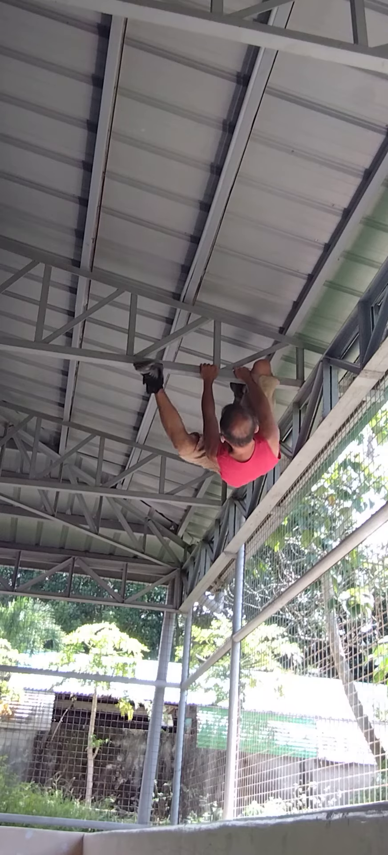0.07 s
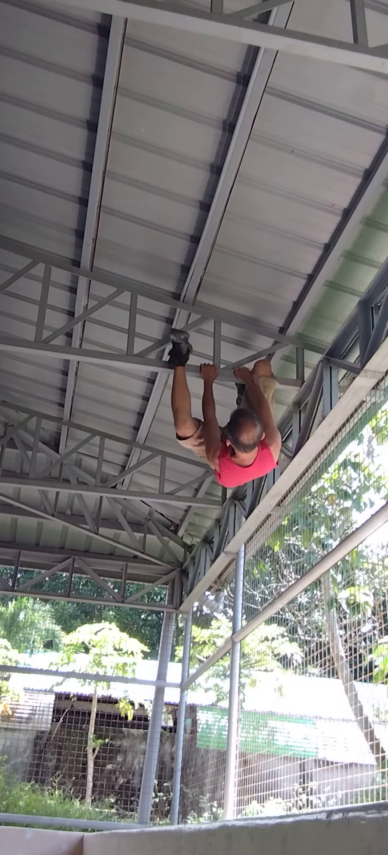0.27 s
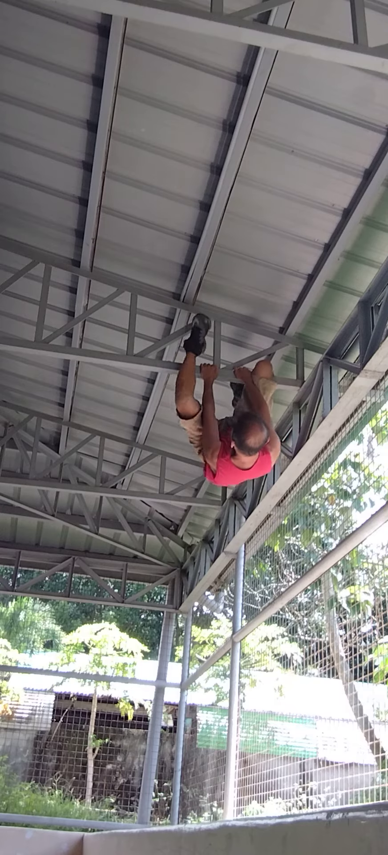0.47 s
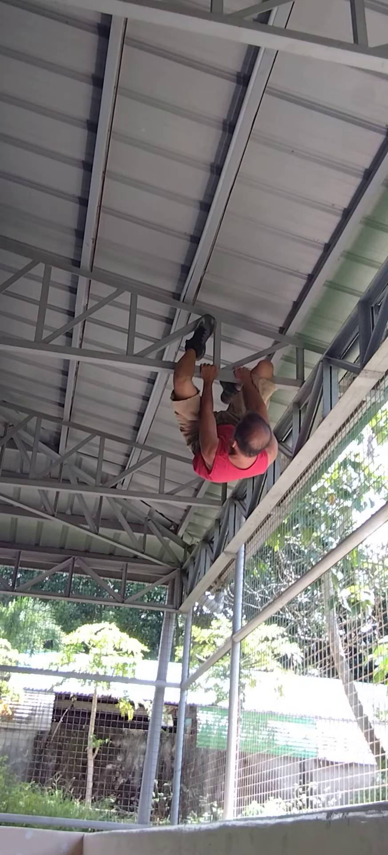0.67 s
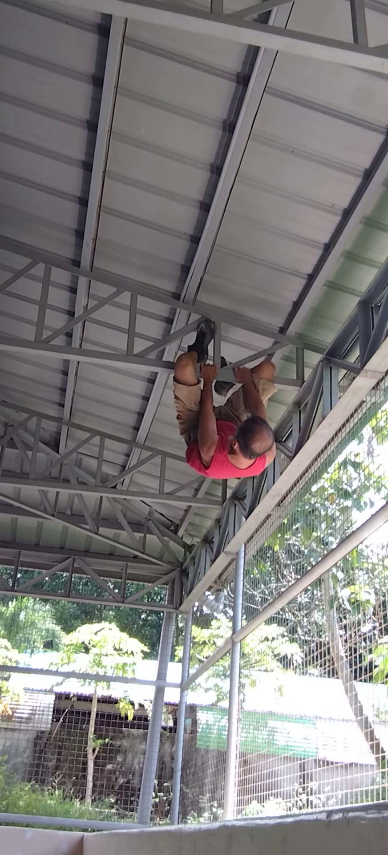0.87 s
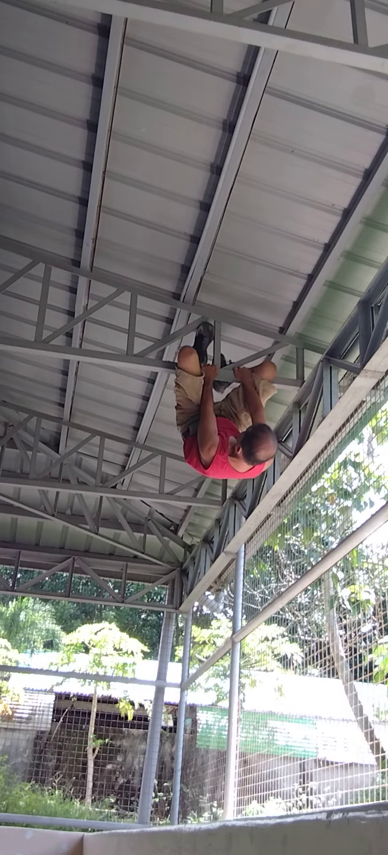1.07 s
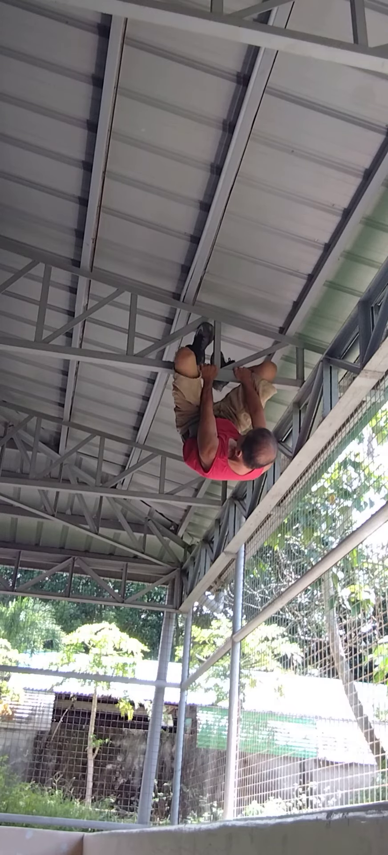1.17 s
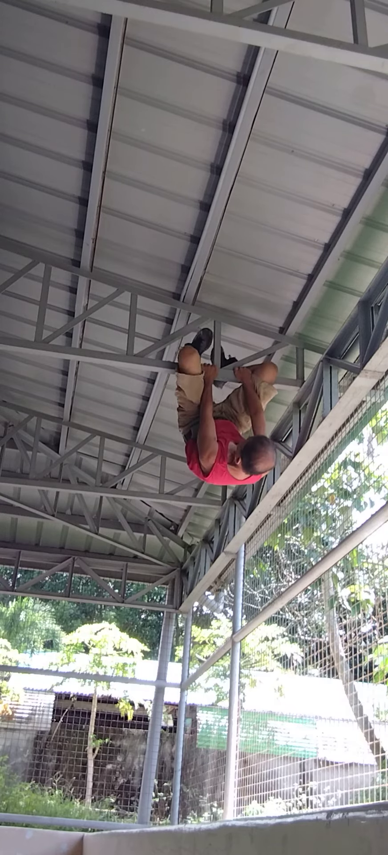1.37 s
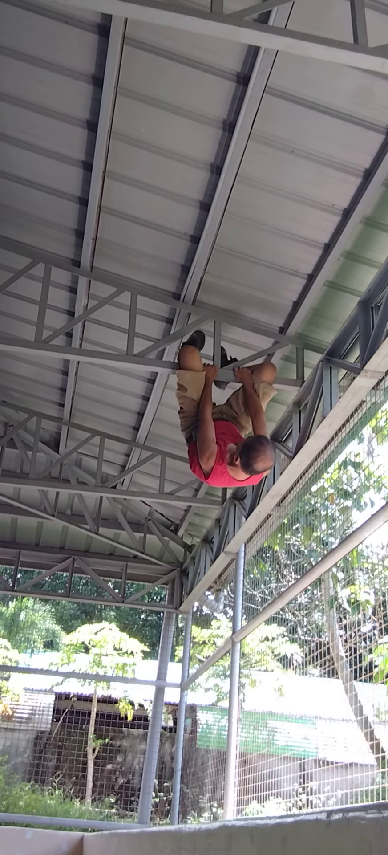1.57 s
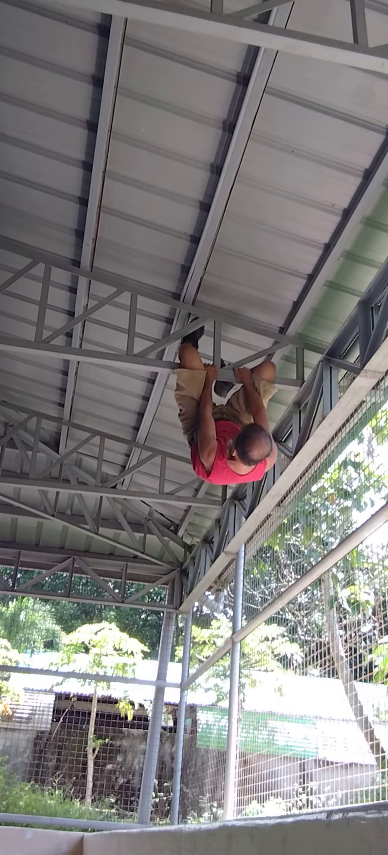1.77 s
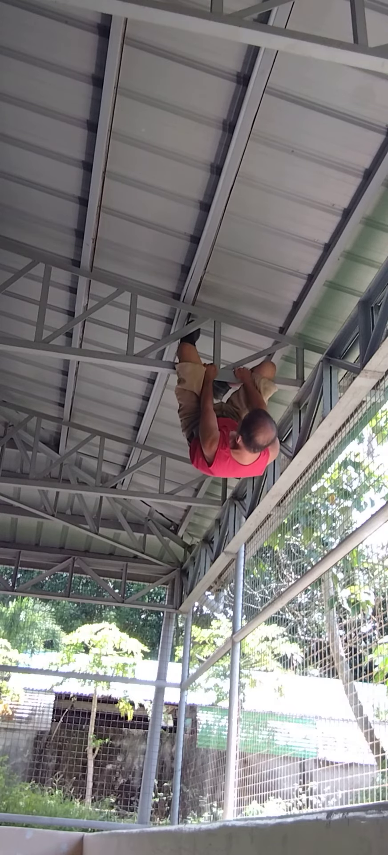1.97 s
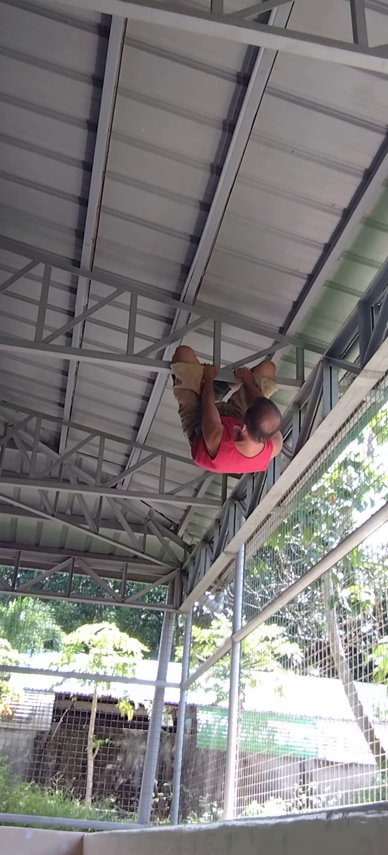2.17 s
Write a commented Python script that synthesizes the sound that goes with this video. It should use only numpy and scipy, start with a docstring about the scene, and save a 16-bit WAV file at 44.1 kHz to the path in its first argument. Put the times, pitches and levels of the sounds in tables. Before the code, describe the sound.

Dull knocks on a steel roof truss in an open shed, over soft steady outdoor noise. The first slaps and thumps at 0.18 s with small clacks; the second, boomier and more ringing, at 0.68 s. Roof sheets rattle and fade. Faint metal groans at 0.9-1.3 s, with light scuffs. Third knock at 1.54 s, then clacks, low pulses, scuffs and a faint rising whistle from 1.94 s.

```python
"""A climber's feet and hands knock on a steel roof truss in an open shed, over steady outdoor noise.
The first knock, near 0.18 s, slaps and thumps; truss modes ring, and noise bands boom and rattle as the roof.
Noise bursts clack, soft low pulses prolong the boom and grainy hiss scuffs before the second, near 0.68 s.
Sine swells then groan as the truss, with more scuffs, until the third knock near 1.54 s.
Clacks, low pulses and scuffs follow it, and from 1.94 s a faint gliding sine whistles upward."""
import sys
import numpy as np
from scipy import signal
from scipy.fft import rfft, irfft
from scipy.io import wavfile
from scipy.ndimage import uniform_filter1d

SR = 44100
rng = np.random.default_rng(int(sys.argv[2]) if len(sys.argv) > 2 else 0)


def bounce(signal):
    """Save signal as a 16-bit WAV file at the path given by the first command-line argument."""
    frames = np.transpose(np.atleast_2d(signal))
    limited = np.clip(frames, -1, 1)
    pcm = np.round(limited * 32767).astype(np.int16)
    wavfile.write(sys.argv[1], SR, pcm)


N = 97020
T = np.arange(N) / SR  # s
HZ = np.fft.rfftfreq(N, 1 / SR)

# Blows on the truss, with the gain of each part:
# start_s, slap_db, thump_db, boom_db, thud_db, clang_db, rattle_db, fizz_db
KNOCK_EVENTS = [(.178, -17, -19, -35, -39.5, -40.5, -30, -43),
                (0.6825, -14.5, -16.5, -27, -36.5, -30, -27, -42),
                (1.5395, -18.5, -16, -28.5, -34, -45, -33, -35)]
# Sharp clacks as the sole and the roof sheets settle: start_s, decay_s (to 1/e), fizz_db, rattle_db
CLACK_EVENTS = [(0.1754, 0.0024, -26, -39.5), (0.192, 0.004, -27, -43), (.2288, 0.0064, -36.5, -30.5),
                (.696, 0.024, -36.5, -30), (0.741, 0.0067, -34.5, -29.5), (0.795, 0.0063, -50, -30.5),
                (1.552, 0.0071, -27, -39), (1.596, 0.0076, -26, -36), (1.62, 0.046, -40, -36.5),
                (1.732, 0.013, -49, -40)]
# Soft low pulses that prolong the boom after the knocks: start_s, pitch_hz, level_db
LOW_PULSE_EVENTS = [(0.233, 79, -25), (0.266, 92, -25), (0.784, 121, -21.5), (1.29, 77.6, -40),
                    (1.789, 102, -25), (1.863, 80, -30.5)]
# The loaded truss groans briefly: start_s, length_s, pitch_hz, level_db
GROAN_EVENTS = [(.87, 0.14, 511, -36.5), (1.096, 0.079, 316, -38), (1.214, 0.13, 316, -41.5)]
# Shoe and cloth scuffs: start_s, length_s, level_db, peak_hz, peak_height_db
SCUFF_EVENTS = [(0.274, 0.2, -41, 7360, 11), (0.419, 0.12, -38.5, 1540, 17.5), (0.907, 0.26, -45, 5530, 20),
                (1.082, 0.18, -48, 7100, 13.5), (1.743, 0.19, -40, 7200, 5.5),
                (1.877, 0.41, -45.5, 2140, 11.5)]
# Faint distant whistle, breakpoints of its glide: time_s, pitch_hz, level_db
WHISTLE_GLIDE = [(1.942, 2390, -60), (2.071, 2475, -44), (2.102, 2530, -43), (2.13, 2530, -48),
                 (2.2, 2560, -51)]
# Truss modes: pitch_hz, t60_s, first_spot_db, second_spot_db, third_spot_db
TRUSS_MODES = [(121.8, 0.96, -30, -23.5, -38.5), (222.6, 1.2, -43.5, -35.5, -41.5),
               (358, 1.48, -54, -33, -43.5), (713, 0.93, -38, -28.5, -35), (768.4, 0.47, -42, -24.5, -30),
               (872, 1.05, -34.5, -24, -57), (1035, 1.1, -51, -47, -33), (1097.6, 1.62, -29, -41.5, -40.5),
               (1201, 1.9, -43, -33, -47), (1620, 2.5, -40.5, -40, -48.5), (1810, 2.2, -39, -59, -49)]
# First reflections of the slap: delay_s (before a random shift), level_db (relative to the direct crack)
SLAP_ECHOES = [(.0033, 6.5), (0.057, -15)]

# Relative spectra of the crack, the roof noises, the scuffs and the background: frequency_hz, density_db
SLAP_SPECTRUM = [(60, 0.5), (1200, 8.5), (2500, 1.5), (4300, -11), (6000, 0.5), (7500, -9.5), (11000, -42),
                 (15000, -33.5)]
BOOM_SPECTRUM = [(20, -37.5), (45, -22), (72, 3), (125, -0.5), (155, -8), (215, -13), (400, -23),
                 (900, -79.5)]
THUD_SPECTRUM = [(90, -32), (160, -4), (205, 6.5), (330, -12), (800, -80.5)]
CLANG_SPECTRUM = [(330, -11), (480, -26.5), (650, 8), (900, 3.5), (1020, -13.5), (5000, -67)]
RATTLE_SPECTRUM = [(60, -18), (200, -4.5), (550, -12.5), (1100, -1.5), (1450, -7), (1900, -7.5),
                   (2800, -12.5), (4200, -20), (7500, -22.5), (10000, -99)]
FIZZ_SPECTRUM = [(1000, -31), (3500, -7.5), (4300, -1.5), (5600, 9), (7400, 10), (8500, 2.5),
                 (11000, -28.5), (14200, -10), (16000, -42)]
SCUFF_SPECTRUM = [(500, -30), (1700, 8.5), (2900, -7), (3550, 8.5), (4200, -4.5), (5600, -0.5),
                  (8500, -6.5), (13000, -46.5)]
AIR_SPECTRUM = [(20, -26.5), (65, 0), (150, -9), (400, -11), (750, -4), (1200, -4.5), (2000, -12),
                (3500, -25), (7800, -29.5), (10500, -61)]
# Likeness of the two ears in diffuse sound: frequency_hz, correlation (0 to 1)
EAR_LIKENESS = [(140, 0.98), (280, 0.86), (550, 0.51), (1200, 0.013)]
# Tilt of the stereo image: frequency_hz, left_minus_right_db
LEFT_LEAN = [(4000, 0.34), (6500, 12), (9500, 1.5)]

THUMP_HZ, THUMP_T60_S, THUMP_LAG_S, THUMP_RISE_S = 114.8, 0.16, 0.0011, 0.0035
ROOF_LAG_S, CLANG_LAG_S = 0.0063, 0.042
LOW_PULSE_RISE_S = 0.0087
SCUFF_PEAK_OCTAVES = 0.2  # half-width
AIR_DB = -39.5
EDGE_HZ = 15900


def knocks():
    """Impact excitation: each blow slaps and thumps, then sets truss and roof sheets vibrating."""
    out = np.zeros((2, N))
    for spot, (start, slap_db, thump_db, boom_db, thud_db, clang_db, rattle_db, fizz_db) in enumerate(KNOCK_EVENTS):
        blow = amp(slap_db) * slap() + amp(thump_db) * thump() + ring(spot)
        boom = wash(BOOM_SPECTRUM, rise_s=0.0034, t60=0.96, first=0.35, hold_s=0.039)
        thud = wash(THUD_SPECTRUM, rise_s=0.081, t60=1.0, first=0.13, hold_s=0.032)
        clang = wash(CLANG_SPECTRUM, rise_s=0.0099, t60=1.0, first=0.17, hold_s=0.11, lag_s=CLANG_LAG_S)
        rattle = wash(RATTLE_SPECTRUM, rise_s=0.0083, t60=1.91, first=0.39)
        rattle *= grit(depth_db=1.5, grain_s=0.0078)
        fizz = wash(FIZZ_SPECTRUM, rise_s=0.054, t60=1.0, first=0.6)
        low_roof = amp(boom_db) * boom + amp(thud_db) * thud
        high_roof = amp(clang_db) * clang + amp(rattle_db) * rattle + amp(fizz_db) * fizz
        add(out, start, blow + low_roof + high_roof)
    return out


def slap(size=1024):
    """Contact impulse: a minimum-phase crack of unit peak, followed by its first reflections."""
    log_gain = np.log(amp(read(SLAP_SPECTRUM)))
    mirrored = np.r_[log_gain, log_gain[-2:0:-1]]
    # the Hilbert transform of the log gain supplies the minimum phase
    response = np.exp(np.conj(signal.hilbert(mirrored)))
    crack = np.fft.ifft(response).real[:size]
    crack = -crack / abs(crack).max()
    out = np.zeros((2, N))
    out[:, :size] = crack
    for delay, db in SLAP_ECHOES:
        for ear in out:
            shift = rng.uniform(-0.00026, 0.00032)
            at = round(abs(delay + shift) * SR)
            ear[at:at + size] += amp(db) * crack
    return out


def thump():
    """Damped oscillation: the first heavy swing of the struck beam."""
    t = np.maximum(T - THUMP_LAG_S, 0)
    rise = 1 - np.exp(-t / THUMP_RISE_S)
    return np.sin(2 * np.pi * THUMP_HZ * t) * rise * fade(THUMP_T60_S)


def ring(spot, rise_s=0.047, smear=0.94, smear_hz=20):
    """Modal superposition: decaying truss tones, each joined by a narrow noise band as shed echoes."""
    out = np.zeros((2, N))
    echoes = rfft(diffuse(RATTLE_SPECTRUM))
    same = np.clip(read(EAR_LIKENESS), 0, 1)
    for hz, t60, *levels in TRUSS_MODES:
        band = echoes / (1 + ((HZ - hz) / smear_hz) ** 2) ** 2
        band *= smear / np.linalg.norm(band[0])
        at = np.searchsorted(HZ, hz)
        # the ears' phases part more where their likeness is low
        phase_turns = rng.random() + (1 - same[at]) * rng.random(2)
        band[:, at] += np.exp(2j * np.pi * phase_turns) / np.sqrt(2)
        tone = evened(irfft(band, N))
        out += tone * (amp(levels[spot]) / np.sqrt(2) * fade(t60))
    return out * np.tanh((T / rise_s) ** 2)


def wash(spectrum, rise_s, t60, first, hold_s=0, lag_s=ROOF_LAG_S, ripple_db=3.0, order=170):
    """Dense-mode vibration: rippled noise spreads through the roof from a share `first`, then decays."""
    growth = np.tanh((np.maximum(T - lag_s, 0) / rise_s) ** 2)
    spread = first + (1 - first) * growth
    # random spectral ripple, drawn anew for each wash, smoothed over `order` bins
    smooth = uniform_filter1d(rng.standard_normal(len(HZ)), order)
    ripple = evened(uniform_filter1d(smooth, order))
    decay = np.minimum(1, fade(t60, T - hold_s))
    return diffuse(spectrum, ripple_db * ripple) * spread * decay


def clacks(tick_db=5, room_db=-20, room_t60=1.0, rise_s=0.0016):
    """Brief contact: a tick and a short gritty chatter, with a faint decaying tail as the shed."""
    out = np.zeros((2, N))
    for start, decay, fizz_db, rattle_db in CLACK_EVENTS:
        tail = np.exp(-T / decay) + amp(room_db) * fade(room_t60)
        shape = tail * (1 - np.exp(-T / rise_s))
        noise = amp(fizz_db) * diffuse(FIZZ_SPECTRUM) + amp(rattle_db) * diffuse(RATTLE_SPECTRUM)
        chatter = noise * grit(depth_db=3.5, grain_s=0.0028)
        tick = amp(rattle_db + tick_db) * slap()  # tick_db is relative to the rattle
        add(out, start, shape * chatter + tick)
    return out


def low_pulses(boom_db=-14, boom_t60=1.0):
    """Low-frequency resonance: soft enveloped cosines and weak boom noise prolong the knocks' boom."""
    out = np.zeros((2, N))
    u = T / LOW_PULSE_RISE_S
    envelope = u ** 2 * np.exp(2 * (1 - u))  # peaks at 1 when u is 1
    for start, hz, db in LOW_PULSE_EVENTS:
        pulse = np.cos(2 * np.pi * hz * T) * envelope
        boom = wash(BOOM_SPECTRUM, rise_s=0.027, t60=boom_t60, first=0)
        add(out, start, amp(db) * (pulse + amp(boom_db) * boom))
    return out


def groans():
    """Single-mode excitation: low truss notes swell and fade as the weight shifts."""
    out = np.zeros((2, N))
    for start, length, hz, db in GROAN_EVENTS:
        swell = np.sin(np.pi * np.minimum(T / length, 1)) ** 2
        add(out, start, amp(db) * swell * np.sin(2 * np.pi * hz * T))
    return out


def scuffs(tail_t60=1.0):
    """Sliding friction: grainy peaked noise swells with each slide and hangs in the shed."""
    out = np.zeros((2, N))
    for start, length, db, hz, peak_db in SCUFF_EVENTS:
        swell = np.sin(np.pi * T / length)
        tail = fade(tail_t60, T - length / 2)
        stroke = np.where(T < length / 2, swell, tail)
        octaves = np.log2((HZ + 1) / hz)
        peak = peak_db / (1 + (octaves / SCUFF_PEAK_OCTAVES) ** 4)
        grain = grit(depth_db=1.0, grain_s=0.0076)
        add(out, start, amp(db) * grain * stroke * diffuse(SCUFF_SPECTRUM, peak))
    return out


def grit(depth_db, grain_s):
    """Amplitude modulation: a random gain of rms 1 roughens sound, as loose surfaces chatter."""
    size = max(1, round(grain_s * SR))
    wander = evened(uniform_filter1d(rng.standard_normal(N), size))
    return evened(amp(depth_db * wander))


def whistle(waver=0.00598, size=300):
    """Frequency modulation: a far sine glides upward, its pitch wavering differently at each ear."""
    time_s, hz, db = np.transpose(WHISTLE_GLIDE)
    drift = evened(uniform_filter1d(rng.standard_normal((2, N)), size))
    pitch = np.interp(T, time_s, hz) * (1 + waver * drift)  # waver: rms fraction of the pitch
    turns = np.cumsum(pitch, axis=1) / SR
    level = np.sqrt(2) * np.interp(T, time_s, amp(db), left=0)
    return level * np.sin(2 * np.pi * turns) * grit(depth_db=1.5, grain_s=0.011)


def background():
    """Stationary diffuse field: coloured noise of constant level as the outdoor background."""
    return amp(AIR_DB) * diffuse(AIR_SPECTRUM)


def diffuse(spectrum, extra_db=0):
    """Interaural correlation: coloured stereo noise of rms 1, alike in both ears only in the bass."""
    a, b = rng.standard_normal((2, len(HZ))) + 1j * rng.standard_normal((2, len(HZ)))
    same = np.clip(read(EAR_LIKENESS), -1, 1)
    ears = np.array([a, same * a + np.sqrt(1 - same ** 2) * b])
    return evened(irfft(ears * amp(read(spectrum) + extra_db), N))


def fade(t60, t=T):
    """Exponential decay: the level falls 60 dB in t60 seconds."""
    return np.exp(-np.log(1000) * t / t60)


def amp(db):
    """Logarithmic level: converts decibels to an amplitude ratio."""
    return 10 ** (np.asarray(db) / 20)


def evened(x):
    """Power normalization: scales a signal to rms 1."""
    return x / np.sqrt(np.mean(x ** 2) + 1e-20)


def read(points):
    """Logarithmic interpolation: reads a table over log frequency at every bin."""
    f, value = np.transpose(points)
    return np.interp(np.log(HZ + 1), np.log(f), value)


def add(mix, start_s, sound):
    """Linear superposition: adds a sound to the mix from its start, cut at the end of the mix."""
    part = mix[:, round(start_s * SR):]
    part += sound[..., :part.shape[1]]


def scene():
    """Superposition and level difference: all sources sum, and the treble leans to the left."""
    mix = knocks() + clacks() + low_pulses() + groans() + scuffs() + whistle() + background()
    lean = amp(np.array([read(LEFT_LEAN), -read(LEFT_LEAN)]) / 2)
    lean /= np.sqrt((lean ** 2).mean(0))  # mean power gain of the two ears is 1
    return irfft(rfft(mix) * lean, N)


def record(dry, treble_hz=8800, leak_db=-11):
    """Linear filtering: the microphone dulls the top treble, then a low-pass limits the band."""
    dull = signal.oaconvolve(dry, signal.firwin(41, treble_hz, fs=SR)[None], "same")
    heard = dull + amp(leak_db) * (dry - dull)
    band_limit = signal.firwin(511, EDGE_HZ, window=("kaiser", 9), fs=SR)
    return signal.oaconvolve(heard, band_limit[None], "same")


dry = scene()
out = record(dry)
bounce(out)
```